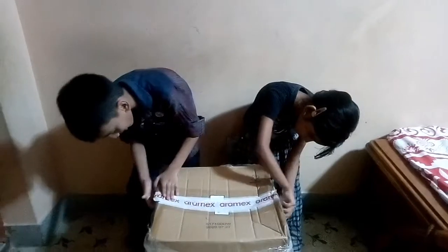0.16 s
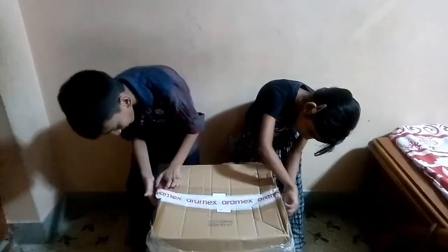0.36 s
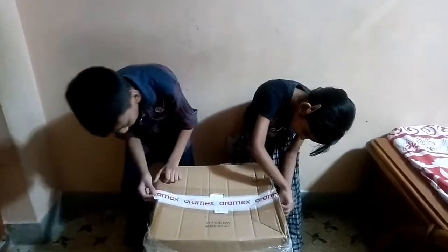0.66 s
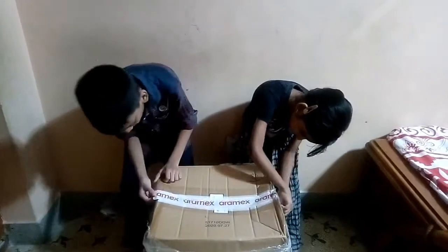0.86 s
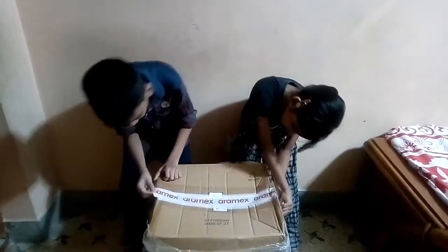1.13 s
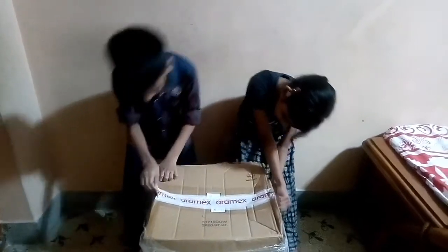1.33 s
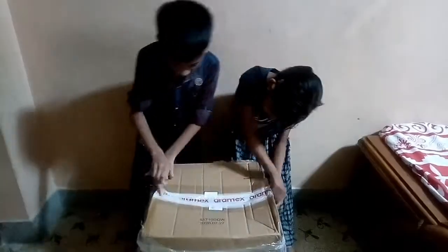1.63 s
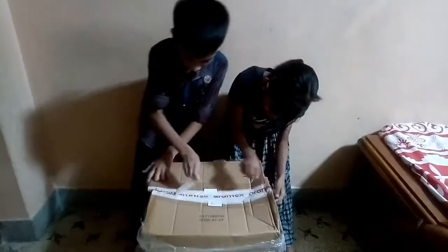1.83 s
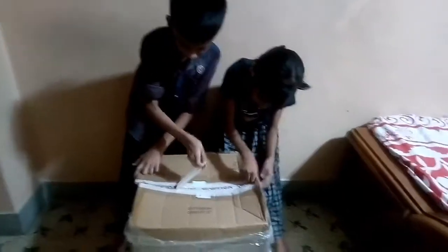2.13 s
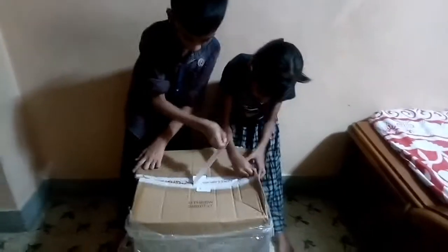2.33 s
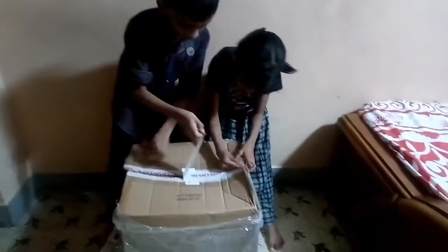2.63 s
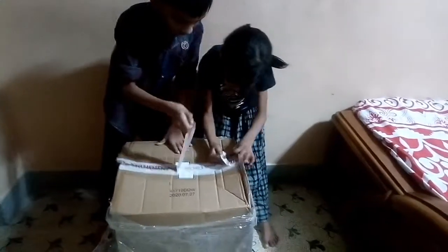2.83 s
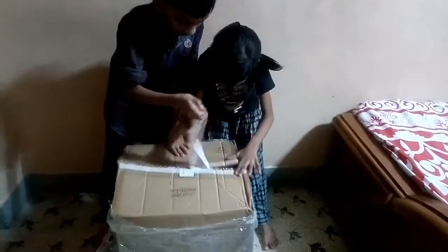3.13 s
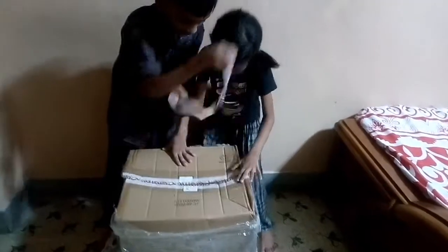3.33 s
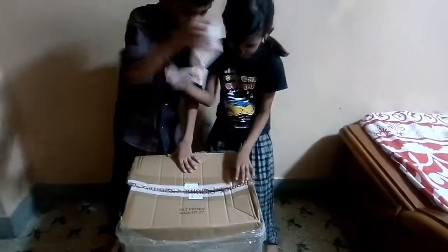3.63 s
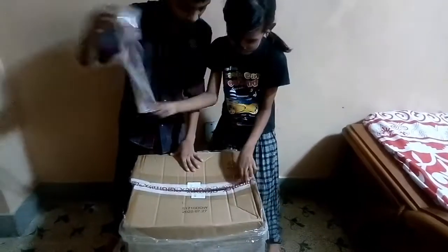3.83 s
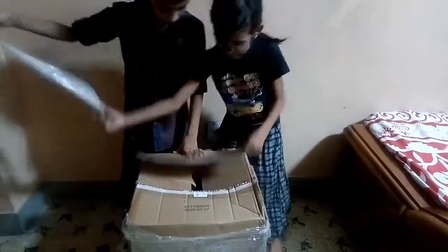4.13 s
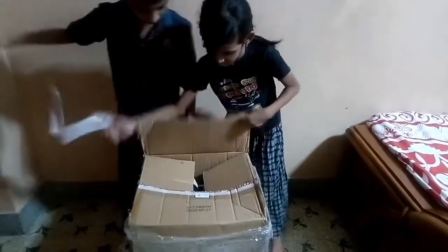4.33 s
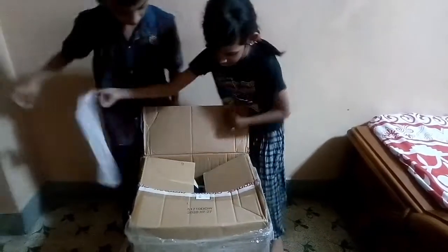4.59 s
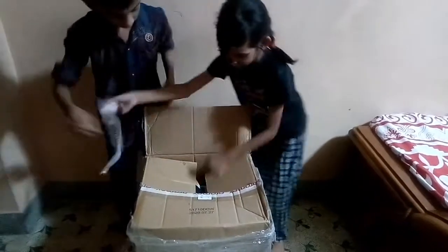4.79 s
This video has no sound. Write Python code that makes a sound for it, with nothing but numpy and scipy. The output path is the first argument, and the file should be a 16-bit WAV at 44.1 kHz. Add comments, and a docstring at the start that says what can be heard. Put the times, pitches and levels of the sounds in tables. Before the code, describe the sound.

Near silence with small rustles and ticks opens the scene. Adhesive tape is then ripped from a cardboard box in short irregular jerks, bright and crackling, with hollow board crunches and dull panel knocks. The strongest snaps come past the middle; then crinkling film and opening flaps trail off. Close, lively bare room; presence-heavy mono sound without the very top, over light hiss.

```python
"""Packing tape is ripped off a cardboard box in tugs, with sharp snaps and a slow peel; the strip and flaps are handled.
The glue lets go in swarms of tiny noise bursts: each crackles in the film, rasps in the board and booms in the box.
Strokes rustle the slack film, the board scrunches and its panels knock at low pitches.
A small bare room adds shifting echoes; a faint hiss lies underneath.
A mono microphone with a sharp presence peak and a steep top limit colours it all."""
import sys
import numpy as np
from scipy import signal
from scipy.fft import rfft, irfft, next_fast_len
from scipy.io import wavfile
from scipy.ndimage import uniform_filter1d, map_coordinates

SR = 44100
rng = np.random.default_rng(int(sys.argv[2]) if len(sys.argv) > 2 else 0)


def int16_out(signal):
    """Quantize to a 16-bit WAV file."""
    q = np.round(np.clip(np.atleast_2d(signal).T, -1, 1) * 32767)
    wavfile.write(sys.argv[1], SR, q.astype(np.int16))


N = 218515

# All levels are ahead of room and microphone.
# Tugs that tear the tape loose. Each row: start in seconds, length in seconds, film level in dB,
# board in dB re film, box in dB re film, pitch of the taut film in Hz.
TUGS = [(1.584, 0.012, -19.5, -7.5, -16, 5500), (1.605, 0.036, -26.5, -5, -9, 5800),
        (1.641, 0.032, -23.5, -8, -24, 5000), (1.676, 0.041, -32, -4.5, -8, 5500),
        (1.987, 0.027, -40, -7.5, -7, 5000), (2.234, 0.035, -36.5, -7, -2, 5800),
        (2.57, 0.012, -21, -16, -10.5, 6500), (2.584, 0.064, -34.5, -7, -11.5, 6000),
        (2.893, 0.0092, -28.5, -6.5, -4, 5500), (2.903, .085, -35.5, -7.5, -14, 5400),
        (2.985, 0.024, -27, -0.5, -14.5, 2100), (3.024, .039, -20, -12.5, -18, 6300),
        (3.064, 0.12, -34, -7, -13, 6200), (3.141, 0.038, -29, -11.5, -6, 5400),
        (3.176, 0.024, -36, -5.5, -0.5, 5900), (3.878, .016, -32.5, -14.5, -29, 6000),
        (4.351, 0.011, -40, -1, -30, 4800)]
# Single snaps of tape and cardboard, ahead of the trims in snaps(). Each row: start in seconds, film level in dB,
# board in dB re film, box in dB re film, pitch of the crease in Hz.
BUCKLES = [(.322, -49, -19, -25, 5600), (1.215, -36.5, -1.5, -30, 3040), (1.2414, -21.5, -9.5, -40, 5000),
           (1.29, -34, -1, -27, 4970), (1.5615, -33.5, -6, -13, 5250), (1.8795, -38.5, -25, -20, 5500),
           (1.9342, -30.5, -12, -19, 5470), (1.9939, -24.5, -26, -30, 4860), (2.082, -29, -10, -24, 5830),
           (2.3835, -26.5, -23, -20, 5050), (2.476, -27, -22, -32, 4840), (2.5356, -25, -31, -22, 4880),
           (2.6168, -11.5, -8, -12, 4700), (2.874, -29, 3.5, -8, 2150), (2.9533, -18.5, -3, -25, 4870),
           (3.1154, -9.5, -31, -13.5, 4700), (3.1218, -21, -3, -22, 4850), (3.1549, -7.5, -13, -23, 5450),
           (3.7324, -28, -13, -33, 5600), (3.8846, -17.5, -19, -48, 6000), (4.1085, -28, -24, -29, 4560),
           (4.352, -21, -5, -40, 4700), (4.4074, -29, -14, -19, 5700), (4.634, -29.5, -4.5, -27, 5000),
           (4.9033, -24.5, -9, -20, 5330)]
# Slow peel along the seam. Each row: time in seconds, strength of the pull in dB.
PEEL_PULL = [(1.87, -60.5), (1.95, -48), (2.05, -51.5), (2.14, -48.5), (2.19, -44), (2.225, -42.5),
             (2.275, -41), (2.34, -46), (2.41, -50), (2.47, -56)]
# Hollow flexing of the cardboard. Each row: start in seconds, length in seconds, level in dB, band centre in Hz.
BOARD_FLEXES = [(1.286, 0.033, -52, 720), (1.587, 0.13, -42, 563), (2.249, 0.022, -45, 670),
                (2.399, 0.012, -39.5, 960), (2.607, 0.036, -42.5, 453), (2.81, 0.0076, -44.5, 1130),
                (2.831, 0.047, -54, 460), (2.895, 0.017, -34.5, 453), (2.942, 0.0463, -40.5, 555),
                (3.023, 0.016, -33.5, 545), (3.17, 0.018, -33.5, 453), (4.164, 0.042, -56, 525)]
# Strokes of a hand, the loose strip or a flap. Each row: start in seconds, length in seconds, film level in dB,
# board in dB re film, box in dB re film.
RUB_STROKES = [(0.3, 0.28, -72.5, -0.5, 3), (0.623, 0.067, -72, -5, -7), (0.837, 0.017, -64.5, -3.5, -22),
               (0.95, 0.046, -80.5, 11.5, -10), (1.13, 0.11, -67, 2, -4), (1.228, 0.08, -55.5, 1, -5),
               (1.358, 0.17, -62, -7, -4.5), (1.412, 0.034, -53, -5.5, -12.5),
               (2.467, 0.025, -43, -6.5, -21), (2.53, 0.021, -43.5, 1.5, -10.5),
               (2.807, 0.036, -50, -3, -6.5), (2.87, 0.028, -46.5, 7, -8), (3.376, 0.034, -51.5, -8, -19),
               (3.418, 0.18, -62.5, -2, -10), (3.644, 0.035, -55.5, -7, -28), (3.721, 0.12, -50, -8, -34),
               (3.865, 0.17, -66.5, -2.5, -6), (4.074, 0.12, -49, -5.5, -19.5),
               (4.299, 0.036, -52, -3.5, -31), (4.365, 0.09, -53.5, -3, -1.5),
               (4.533, 0.058, -53.5, -7.5, -24), (4.593, 0.059, -50, -4, -23), (4.76, 0.085, -53, -7, -28),
               (4.83, 0.076, -54, -8.5, 1.5), (4.912, 0.046, -42, -11, -17)]
# Dull knocks as the lid springs back or a hand lands on it. Each row: start in seconds, level in dB,
# pitch of the panel in Hz, t60 in seconds.
PANEL_KNOCKS = [(.443, -51.5, 326, 0.24), (1.601, -33, 333, 0.14), (1.619, -28, 202.4, .2),
                (1.683, -25.5, 207.6, 0.27), (2.582, -32, 116, 0.16), (3.17, -26, 360, 0.12),
                (4.472, -43.5, 262, 0.081), (4.478, -48, 128, 0.13), (4.84, -43.5, 314, 0.082),
                (4.875, -45, 260, .1), (4.918, -45, 129, .16)]
# Radiation of the taut film. Each row: frequency in Hz, relative level in dB.
TAUT_FILM_SPECTRUM = [(300, -58), (1200, -29), (2400, 3), (4000, 2), (7000, 4), (16000, 4)]
# Radiation of slack, rubbed film. Each row: frequency in Hz, relative level in dB.
SLACK_FILM_SPECTRUM = [(300, -52.5), (1200, -35), (2000, 8.5), (3000, 8), (4000, 3.5), (6500, 1),
                       (9000, -3), (16000, -4)]
# Radiation of the board. Each row: frequency in Hz, relative level in dB.
BOARD_SPECTRUM = [(200, -55), (500, -12.5), (800, -4), (1200, 2), (2300, 3), (3300, 0), (6000, -31.5),
                  (12000, -68.5)]
# Radiation of the box. Each row: frequency in Hz, relative level in dB.
BOX_SPECTRUM = [(20, -38), (40, -24), (55, -14.5), (75, -6), (110, -3), (165, -1), (210, 0.5), (260, -3),
                (345, -1), (450, -12.5), (750, -9.5), (1200, -24), (3000, -105)]
# Colour of the room's hiss. Each row: frequency in Hz, relative level in dB.
HISS_SPECTRUM = [(20, -14), (50, -10), (100, 1), (200, -0.5), (450, -5), (950, -0.5), (1700, -10),
                 (3000, 2), (4000, -8), (5200, -4.5), (6500, -15.5), (8000, -39), (11000, -42),
                 (15000, -24)]
# Decay of the room. Each row: frequency in Hz, t60 in seconds.
ROOM_DECAY = [(100, 0.34), (260, 0.33), (700, 0.31), (2000, 0.34), (5000, 0.3), (13000, 0.29)]
# Microphone colour. Each row: frequency in Hz, gain in dB.
MIC_SPECTRUM = [(30, 9), (55, 2.5), (90, -0.5), (3400, -2), (4200, 1.5), (5200, 6), (6500, 4.5), (7400, -3),
                (8500, -12), (10000, -15), (12500, -15), (14000, -13), (14800, 2.5), (15500, 0.5),
                (15900, -28)]

MIC_TOP_HZ = 16100
BITE_S, BITE_DB, SLACKEN_DB = 0.0051, 14, 4  # a tug builds by BITE_DB in BITE_S, loses SLACKEN_DB over its length
PEEL_BOARD_DB, PEEL_BOX_DB = -5, -4  # re film
TICKS_PER_S, TICK_DB, TICK_SCATTER_DB = 8.2, -46, -5
RUB_ATTACK_S, RUB_ATTACK_SHARE, RUB_RELEASE_S = 0.014, 0.19, 0.037  # attack: seconds plus a share of the length
RESTING_DB = -75.5  # hands never lie quite still on the film
WAVER_DB, WAVER_PER_S = 0.5, 32  # uneven pressure of a stroke


def rips():
    """Each tug frees glue in one swarm of slips that builds quickly and weakens as the tape slackens."""
    forces = np.zeros((3, N))
    glue = slips(rate_per_s=600, scatter_db=5, life_s=0.0004, smooth=0.2)
    for start_s, length_s, db, board_db, box_db, hz in TUGS:
        length = max(round(length_s * SR), 2)
        swarm = unit(glue[round(start_s * SR):][:length])
        t = np.arange(len(swarm)) / SR
        bite_db = BITE_DB * np.minimum(t / BITE_S - 1, 0)
        slacken_db = SLACKEN_DB * (t / length_s - 0.5)
        swarm = swarm * amp(bite_db - slacken_db)
        film = crease(swarm, hz, ring_db=-8, quality=5)
        levels = amp([[db], [db + board_db], [db + box_db]])
        add(forces, start_s, levels * [film, swarm, swarm])
    return radiate_parts(forces, TAUT_FILM_SPECTRUM)


def snaps(film_trim_db=-3, board_trim_db=-5, box_trim_db=-9, click=1.9):
    """A crease buckles: one sharp click, a short crackle in the film, a slower give in board and box."""
    forces = np.zeros((3, N))
    t = np.arange(SR // 20) / SR
    decay_s = np.array([[0.0009], [0.0025], [0.006]])  # film, board, box
    envelopes = np.exp(-t / decay_s)
    for start_s, db, board_db, box_db, hz in BUCKLES:
        bursts = envelopes * rng.choice([-1, 1], len(t))
        bursts[:, 0] = click
        bursts[0] = crease(bursts[0], hz, ring_db=4, quality=3.5)
        trims_db = np.array([[film_trim_db], [board_db + board_trim_db], [box_db + box_trim_db]])
        add(forces, start_s, amp(db + trims_db) * bursts)
    return radiate_parts(forces, TAUT_FILM_SPECTRUM)


def peel():
    """One pull drives film, board and box while the taut tape creeps off the seam."""
    s, db = np.transpose(PEEL_PULL)
    pull = amp(np.interp(np.arange(N) / SR, s, db, left=-120, right=-120))
    creep = slips(rate_per_s=300, scatter_db=4.5, life_s=0.0005, smooth=0.4)
    shares = amp([[0], [PEEL_BOARD_DB], [PEEL_BOX_DB]])
    return radiate_parts(pull * creep * shares, TAUT_FILM_SPECTRUM)


def scrunches(quality=0.64):
    """The corrugated wall gives way in a short crunch: a noise burst passed twice through one broad resonance."""
    out = np.zeros(N)
    for start_s, length_s, db, hz in BOARD_FLEXES:
        b, a = signal.iirpeak(hz, quality, fs=SR)
        burst = rng.standard_normal(max(round(length_s * SR), 2))
        force = np.pad(burst, (0, SR // 100))  # room to ring out
        crunch = signal.lfilter(b, a, signal.lfilter(b, a, force))
        add(out, start_s, amp(db) * crunch * np.linalg.norm(force) / np.linalg.norm(crunch))
    return out


def rustle():
    """Fingers, the loose strip and the flaps rub and crinkle in sparser slips."""
    crinkle = slips(rate_per_s=300, scatter_db=4.5, life_s=0.0005, smooth=0.45)
    return radiate_parts(strokes() * crinkle, SLACK_FILM_SPECTRUM)


def strokes():
    """Stroke pressure swells, holds unevenly and dies away, over a faint resting pressure on the film."""
    forces = np.zeros((3, N))
    forces[0] = amp(RESTING_DB)
    t = np.arange(SR // 2) / SR
    for start_s, length_s, db, board_db, box_db in RUB_STROKES:
        swell = np.minimum(t / (RUB_ATTACK_S + RUB_ATTACK_SHARE * length_s), 1)
        release = np.exp(-np.maximum(t - length_s, 0) / RUB_RELEASE_S)
        levels = amp([[db], [db + board_db], [db + box_db]])
        add(forces, start_s, levels * swell * release)
    waver = map_coordinates(rng.standard_normal(N // 100), [np.arange(N) * WAVER_PER_S / SR])
    return forces * amp(WAVER_DB * waver)


def ticks():
    """Tiny creases of the handled tape give way at random moments as single clicks."""
    sizes = amp(TICK_DB + TICK_SCATTER_DB * np.clip(rng.standard_normal(N), -2, 2))
    fires = rng.random(N) < TICKS_PER_S / SR
    return radiate(fires * sizes, TAUT_FILM_SPECTRUM)


def knocks(attack_s=0.0041):
    """A knocked cardboard panel rings briefly at one low pitch."""
    out = np.zeros(N)
    t = np.arange(SR // 2) / SR
    attack = 1 - np.exp(-t / attack_s)
    for start_s, db, hz, t60_s in PANEL_KNOCKS:
        ring = amp(db - 60 * t / t60_s) * np.sin(2 * np.pi * hz * t)
        add(out, start_s, ring * attack)
    return out


def slips(rate_per_s, scatter_db, life_s, smooth):
    """Stick-slip force of rms 1: tiny noise bursts of random moment and size over a smooth hiss."""
    fires = rng.random(N) < rate_per_s / SR
    sizes = fires * amp(scatter_db * np.clip(rng.standard_normal(N), -2, 2))
    power = signal.lfilter([1], [1, -np.exp(-1 / (life_s * SR))], sizes ** 2)
    envelope = np.sqrt(power / power.mean() + abs(smooth))
    return unit(envelope * rng.standard_normal(N))


def crease(x, hz, ring_db, quality):
    """A taut patch of film rings briefly at its own pitch; the energy is kept."""
    b, a = signal.iirpeak(min(hz, SR / 3), max(quality, 1), fs=SR)
    y = x + amp(ring_db) * signal.lfilter(b, a, x)
    return y * np.linalg.norm(x) / np.linalg.norm(y)


def radiate_parts(forces, film_spectrum):
    """Film, board and box each sound their share of the force."""
    film, board, box = forces
    return radiate(film, film_spectrum) + radiate(board, BOARD_SPECTRUM) + radiate(box, BOX_SPECTRUM)


def radiate(force, spectrum):
    """Colour a force through a response of unit energy, which keeps the power of white noise."""
    h = response(spectrum)
    return signal.fftconvolve(force, h / np.linalg.norm(h))[:N]


def response(spectrum, size=8192):
    """Minimum-phase impulse response of a (Hz, dB) spectrum, by folding its cepstrum."""
    gain = amp(along(spectrum, np.fft.rfftfreq(size, 1 / SR)))
    cepstrum = irfft(np.log(gain))
    cepstrum[1:size // 2] *= 2
    cepstrum[size // 2 + 1:] = 0
    return irfft(np.exp(rfft(cepstrum)))


def along(points, hz):
    """(Hz, value) points read on a log frequency axis."""
    f, v = np.transpose(points)
    return np.interp(np.log(hz + 1), np.log(f + 1), v)


def amp(db):
    """Decibels to gain."""
    return 10 ** (np.asarray(db) / 20)


def unit(x):
    """x scaled to rms 1."""
    return x / np.sqrt(np.mean(x ** 2) + 1e-20)


def add(track, start_s, x):
    """Mix x into track from start_s on."""
    start = max(round(start_s * SR), 0)
    part = track[..., start:start + x.shape[-1]]
    part += x[..., :part.shape[-1]]


def room(x, wet_db, early_db, gap_s, drift_per_s=12, count=6):
    """The source moves, so one echo pattern gives way to the next, drift_per_s times a second."""
    place = drift_per_s * np.arange(N) / SR
    wet = np.zeros(N)
    for k in range(count):
        distance = np.minimum(abs((place + k) % count - count / 2), 1)
        feed = x * np.cos(np.pi / 2 * distance)
        wet += signal.fftconvolve(feed, echoes(early_db, gap_s))[:N]
    return (x + amp(wet_db) * wet) / np.hypot(1, amp(wet_db))


def echoes(early_db, gap_s, count=12):
    """A few early wall echoes, then a tail in which each frequency dies at its own speed."""
    hz, t, z = signal.stft(rng.standard_normal(SR // 2), SR, nperseg=256)
    decay = amp(-60 * t / along(ROOM_DECAY, hz)[:, None])
    tail = signal.istft(z * decay, SR, nperseg=256)[1]
    tail *= 1 - np.exp(-np.arange(len(tail)) / (gap_s * SR))
    tail /= np.linalg.norm(tail)
    places = (rng.uniform(0.001, 0.012, count) * SR).astype(int)
    tail[places] += amp(early_db) * rng.choice([-1, 1], count) / np.sqrt(count)
    return tail / np.linalg.norm(tail)


def hiss(patchy_db=2):
    """The quiet room's hiss wavers in patches of time and frequency."""
    z = signal.stft(rng.standard_normal(N), nperseg=1024)[2]
    field = uniform_filter1d(rng.standard_normal(z.shape), size=6, axis=0)
    field = uniform_filter1d(field, size=12, axis=1)
    noise = signal.istft(z * amp(patchy_db * unit(field)), nperseg=1024)[1][:N]
    return radiate(unit(noise), HISS_SPECTRUM)


def scene():
    """Tape and box in the room, with dry knocks and a faint hiss, the same on two channels."""
    tearing = room(rips() + scrunches(), wet_db=3, early_db=-1, gap_s=0.00098)
    snapping = room(snaps(), wet_db=3.5, early_db=-1.5, gap_s=0.0041)
    handling = room(peel() + rustle() + ticks(), wet_db=2.5, early_db=-1, gap_s=0.0013)
    mono = tearing + snapping + handling + knocks() + amp(-66.5) * hiss()
    return np.tile(mono, (2, 1))


def record(dry):
    """The microphone's colour and a steep band limit, applied as one spectrum."""
    size = next_fast_len(N + SR // 2)
    passband = np.fft.rfftfreq(size, 1 / SR) < MIC_TOP_HZ
    colour = rfft(response(MIC_SPECTRUM), size)
    return irfft(rfft(dry, size) * colour * passband, size)[:, :N]


dry = scene()
out = record(dry)
int16_out(out)
```